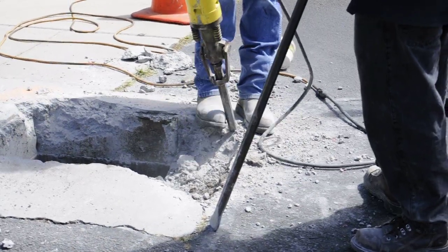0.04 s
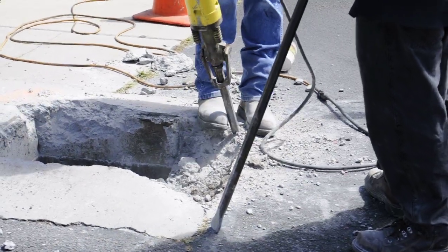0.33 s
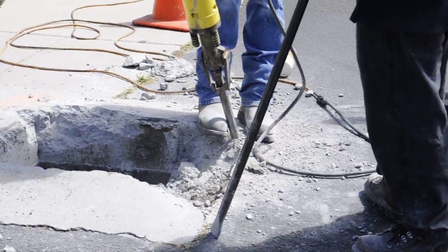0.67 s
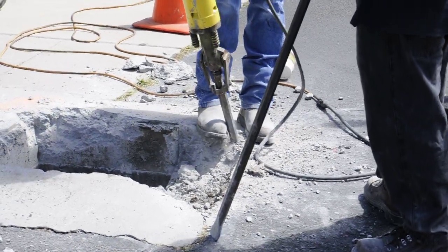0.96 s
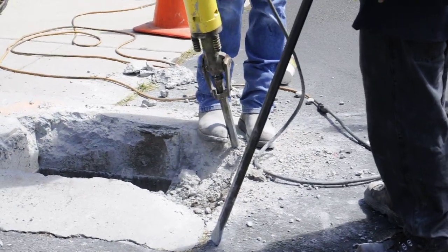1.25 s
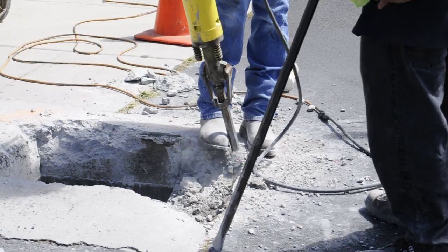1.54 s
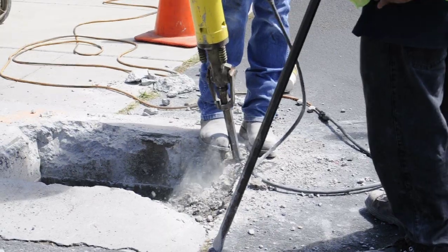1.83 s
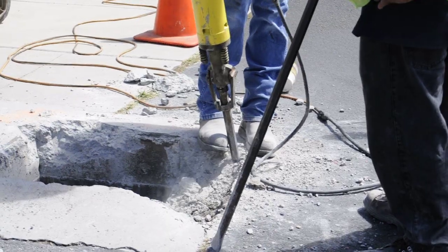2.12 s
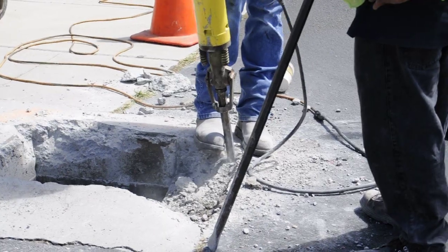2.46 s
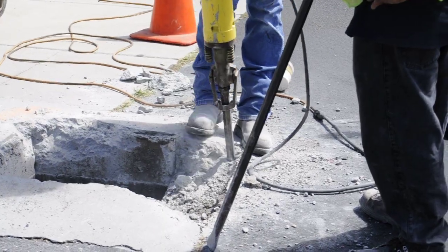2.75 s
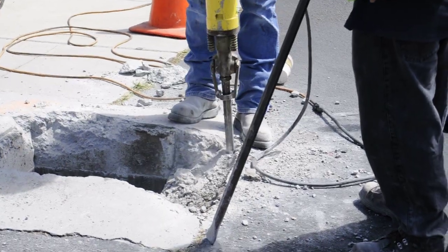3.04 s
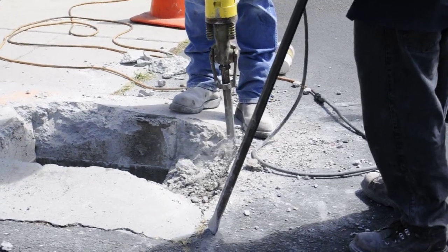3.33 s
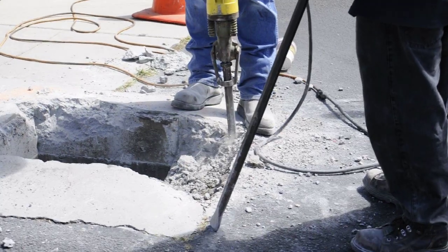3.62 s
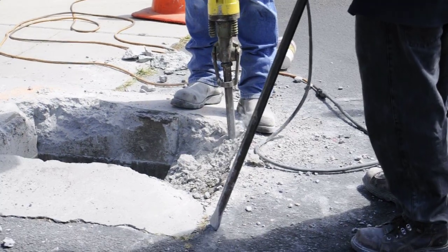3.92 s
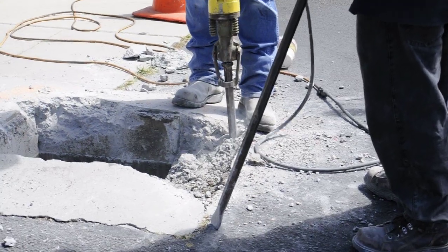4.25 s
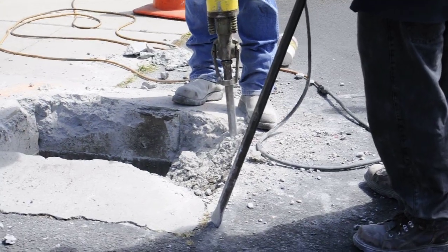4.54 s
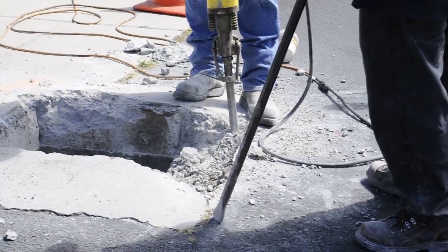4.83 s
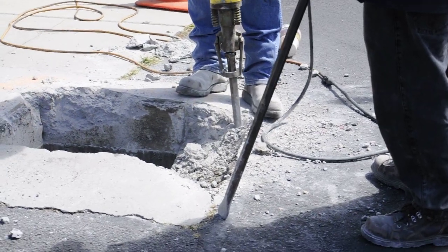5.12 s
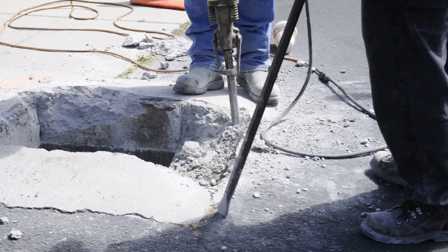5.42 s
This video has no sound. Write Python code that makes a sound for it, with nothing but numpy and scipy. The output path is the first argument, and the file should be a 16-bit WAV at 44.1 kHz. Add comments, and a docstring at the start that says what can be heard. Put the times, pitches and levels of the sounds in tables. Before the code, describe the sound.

Loud, continuous pneumatic hammering on concrete, with bright metallic clatter, crunching grit and hissing air, while an engine runs underneath.

```python
"""At the edge of a street trench, a pneumatic jackhammer breaks concrete, about 14 blows a second.
After each blow the chisel chatters in its holder, rings and crushes grit; compressed air hisses.
A compressor engine drones and thumps once a turn, and the house fronts return a short tail.
Overload rounds the peaks and crackles on the highest crests; the treble is cut at 6 kHz."""
import sys
import numpy as np
from scipy import signal
from scipy.fft import rfft, irfft, next_fast_len
from scipy.io import wavfile
from scipy.ndimage import map_coordinates

SR = 44100
rng = np.random.default_rng(int(sys.argv[2]) if len(sys.argv) > 2 else 0)


def store_pcm(level_fs):
    """Save levels as 16-bit WAV."""
    pcm = np.round(np.clip(level_fs, -1, 1) * 32767).astype(np.int16)
    wavfile.write(sys.argv[1], SR, np.atleast_2d(pcm).T)


N = 246078

# chisel modes, two groups: f/Hz, level/dB, t60/s
LOWER_MODES = [(4372, 0, .085)]
UPPER_MODES = [(5046, -5, 0.041), (5031, 8, 0.055), (5977, -16, 0.07)]
# concrete and housing spectra: f/Hz, level/dB
CRUNCH_SPECTRUM = [(60, -39), (200, -6), (420, -3), (620, -0.5), (800, -1), (1150, 2), (1500, 0), (1750, 1),
                   (2300, -1.5), (3200, -3), (6000, -15.5)]
CLATTER_SPECTRUM = [(1200, -37.5), (2400, -9), (2900, -9), (3350, -3), (4000, -3), (4500, 0), (4850, 0),
                    (5200, 0.5), (5450, -4), (5750, -12), (6100, -27)]


def jackhammer():
    """The same contacts crush the concrete, rattle the housing and ring the chisel."""
    times = blow_times()
    crunch_db, clatter_db, lower_db, upper_db = blow_levels(times)
    force = contacts(len(times), gap_s=.0075, strike_db=1.5, scatter_db=2.5, fade_db=2.5, seated_s=.072)
    grit = amp(3.26 * rng.standard_normal(force.shape))  # fragments of very unequal size
    cracks = grit * bursts(force, rise_s=.00051, t60_s=.015, tail_t60_s=.086)
    crunch = coloured(per_blow(times, cracks, crunch_db), CRUNCH_SPECTRUM)
    rattles = bursts(force, rise_s=.0035, t60_s=.026, tail_t60_s=.082)
    clatter = coloured(per_blow(times, rattles, clatter_db), CLATTER_SPECTRUM)
    lower = per_blow(times, ringing(force, LOWER_MODES, detune_hz=2.6), lower_db)
    t = np.arange(force.shape[1]) / SR
    early_force = force * amp(-7 * (t / .05) ** 2)  # late rebounds barely reach the upper modes
    upper = per_blow(times, ringing(early_force, UPPER_MODES, detune_hz=20), upper_db)
    return crunch + clatter + lower + upper


# piston pace: t/s, rate/Hz
PISTON_RATE = [(.14, 13.9), (.3, 13.06), (.5, 12.24), (1.0, 13.69), (1.9, 13.62), (3.05, 14.06),
               (3.8, 13.47), (4.2, 13.8), (5.58, 13.76)]


def blow_times(first_s=.067):
    """The piston strikes each time it completes a cycle."""
    cycles = np.cumsum(curve(PISTON_RATE)) / SR
    cycles -= cycles[round(first_s * SR)]
    return np.searchsorted(cycles, np.arange(int(cycles[-1]) + 1)) / SR


# blow force as the tool starts and is leant on: t/s, level/dB
EFFORT = [(.07, -13.5), (.14, -2.5), (.3, 0), (.5, 0.5), (1.2, 1.5), (1.8, 0), (2.75, .5), (3.2, -.5),
          (4.25, -.5), (4.45, .5), (4.65, -1), (4.9, 1), (5.1, -.5), (5.58, 0)]
# chisel seat, favouring the upper (+) or lower (-) modes: t/s, bias/dB
SEAT_BIAS = [(.25, -3.5), (.5, 0), (1.1, 1.5), (1.7, 3.5), (2.1, -1), (2.5, 1.5), (3.15, -0.5), (3.5, 3),
             (3.8, 2), (4.0, -3.5), (4.8, -6), (5.05, -1.5), (5.4, -6), (5.58, 0.5)]
# blows on hard stone: t/s, lower ring change/dB, upper ring change/dB
HARD_BLOWS = [(.76, 5.5, 0.5), (.91, 0, 2.5), (1.06, 8.5, -7), (1.21, 0.5, 1), (1.28, 4.5, 4.5),
              (1.5, 0.5, 2.5), (2.16, 0, 4), (2.38, -0.5, 5), (2.74, -2, 3.5), (3.02, -3.5, 5),
              (3.31, 1, 5), (4.04, 9.5, -3), (4.91, 4, -1.5), (5.42, 4, 0.5), (5.49, 6, -2)]


def blow_levels(times, ring_scatter_db=1.5, noise_scatter_db=.88):
    """Effort drives every part of a blow; the seat shares out the ring, and hard stone adds to it."""
    effort_db, seat_db = at(times, EFFORT), at(times, SEAT_BIAS)
    chance = rng.standard_normal((len(times), 4))
    extra_db = ring_scatter_db * chance[:, :2]
    for time_s, *change_db in HARD_BLOWS:
        extra_db[np.argmin(np.abs(times - time_s))] = change_db
    crunch_db = -25 + noise_scatter_db * chance[:, 2]
    clatter_db = -18 + noise_scatter_db * chance[:, 3]
    lower_db = -26 - .49 * seat_db + extra_db[:, 0]
    upper_db = -22.5 + seat_db + extra_db[:, 1]
    return effort_db + np.array([crunch_db, clatter_db, lower_db, upper_db])


def contacts(count, gap_s, strike_db, scatter_db, fade_db, seated_s):
    """One row of force per event: a strike, then uneven rebounds until the chisel is seated again."""
    shape, size = (count, 16), SR // 6
    gaps = gap_s * rng.uniform(.5, 1.5, shape)
    delays = np.cumsum(gaps, axis=1) - gaps[:, :1]
    pushes = amp(scatter_db * rng.standard_normal(shape) - fade_db * delays / seated_s)
    pushes *= delays < seated_s
    pushes[:, 0] = amp(strike_db)
    offsets = (delays * SR).astype(int)
    return np.array([np.bincount(offset, push, size)[:size] for offset, push in zip(offsets, pushes)])


def bursts(force, rise_s, t60_s, tail_t60_s, tail_db=-8):
    """Each contact sets off a short crack and a weaker, longer wash of dense modes."""
    t = np.arange(force.shape[1]) / SR
    decay = amp(-60 * t / t60_s) ** 2 + amp(tail_db - 60 * t / tail_t60_s) ** 2
    contact_power = decay * (1 - np.exp(-t / rise_s)) ** 2
    power = signal.fftconvolve(force ** 2, contact_power[None], axes=1)[:, :len(t)]
    return np.sqrt(np.abs(power)) * rng.standard_normal(force.shape)


def ringing(force, modes, detune_hz, rise_s=.0016):
    """Contacts ring the chisel; its seat shifts the modes a little from blow to blow."""
    t = np.arange(force.shape[1]) / SR
    ring = np.zeros(force.shape)
    for hz, db, t60_s in modes:
        gain = amp(db + 2 * rng.standard_normal((len(force), 1)))
        shifted_hz = hz + detune_hz * rng.standard_normal((len(force), 1))
        ring += gain * amp(-60 * t / t60_s) * np.sin(2 * np.pi * shifted_hz * t)
    return signal.fftconvolve(force, ring * (1 - np.exp(-t / rise_s)), axes=1)[:, :len(t)]


# shank bouncing off hard stone, chisel hitting its retainer: t/s, relative level/dB
PINGS = [(0.236, -23), (0.356, -24.5), (0.454, -21.5), (0.707, -23.5), (0.926, -24), (0.996, -23.5),
         (1.059, -25.5), (3.262, -24.5)]
CLINKS = [(0.47, -21.5), (0.55, -21), (0.625, -20.5), (0.711, -23.5), (0.942, -20), (1.519, -22),
          (3.535, -23)]
# their modes: f/Hz, level/dB, t60/s
PING_MODES = [(3130, -3.5, .08), (3180, -6.5, 0.076)]
CLINK_MODES = [(5487, 0, 0.1), (5505, -1.5, 0.072)]


def steel_chime(events, modes, gain_db, faint_db, fade_db_per_s, lag_s, scatter_db=4):
    """Steel contacts ring: a few loud runs, and a faint one per blow, waning as the chisel sinks in."""
    blows = blow_times()
    run_db = faint_db - fade_db_per_s * blows + at(blows, EFFORT)
    run_db += scatter_db * rng.standard_normal(len(blows))
    faint_runs = np.column_stack([blows + lag_s, run_db])
    times, level_db = np.vstack([events, faint_runs]).T
    force = contacts(len(times), gap_s=.009, strike_db=3.5, scatter_db=.5, fade_db=5.5, seated_s=.035)
    return per_blow(times, ringing(force, modes, detune_hz=2.6), level_db + gain_db)


# air flow as the trigger opens: t/s, level/dB
AIR_FLOW = [(0, 1.5), (.12, -1), (.18, 0)]


def air():
    """Compressed air leaves the tool with a fluttering hiss and a weaker roar."""
    hiss = amp(-26 + 1.6 * wobble(25)) * coloured(rng.standard_normal(N), CLATTER_SPECTRUM)
    roar = amp(-34) * coloured(rng.standard_normal(N), CRUNCH_SPECTRUM)
    return amp(curve(AIR_FLOW)) * (hiss + roar)


SHAFT_HZ = 22.68
# exhaust thumps: t/s, relative level/dB
THUMP_LEVEL = [(0, -24), (.22, -19), (.3, -30.5), (1.2, -29.5), (2.7, -27.5), (3.15, -22), (3.65, -20),
               (4.35, -18), (4.55, -30), (5.58, -37)]
# exhaust noise: f/Hz, level/dB
PUFF_SPECTRUM = [(30, -20.5), (100, -17), (200, -11), (275, 3.5), (340, -2.5), (480, -17), (1500, -32.5)]


def exhaust(first_s=.007, rise_s=.0027, t60_s=.05, trench_hz=275, scatter_db=1.5, gap_db=4.5):
    """Once a turn an engine puff booms in the trench; those between two blows come through loudest."""
    times = np.arange(first_s, N / SR, 1 / SHAFT_HZ)
    chance = rng.standard_normal((len(times), 2))
    blows = blow_times()
    piston_cycles = np.interp(times, blows, np.arange(len(blows)))
    between_blows = np.cos(2 * np.pi * (piston_cycles - .65))
    level_db = at(times, THUMP_LEVEL) + gap_db * between_blows + scatter_db * chance[:, 0]
    t = np.arange(SR // 8) / SR
    envelope = (1 - np.exp(-t / rise_s)) * amp(-60 * t / t60_s)
    puffs = amp(level_db)[:, None] * envelope / envelope.max()
    boom_hz = trench_hz * np.exp(.05 * chance[:, 1:])
    boom = placed(times, puffs * np.sin(2 * np.pi * boom_hz * t))
    rush = placed(times, puffs) * coloured(rng.standard_normal(N), PUFF_SPECTRUM)
    return amp(-8.5) * boom + amp(-12) * rush


# compressor drone: t/s, relative level/dB
DRONE_LEVEL = [(0, -25), (.1, -27.5), (.23, -24), (.25, -32), (.45, -37), (.9, -40.5), (2, -37.5),
               (3.2, -35.5), (4.6, -35.5), (5.58, -41)]
# engine lines: shaft order, level/dB
SHAFT_ORDERS = [(2, -27.5), (4, -3.5), (6, -9.5), (11, 1.5), (12, 4), (14, 4)]
# engine rumble: f/Hz, level/dB
RUMBLE_SPECTRUM = [(20, -31.5), (45, -9), (70, -2), (110, -0.8), (160, 1), (280, -2.5), (440, -2.5),
                   (650, -8.5), (850, -5.5), (1150, -4), (1420, -12), (1800, -7), (2700, -21), (6000, -36)]


def compressor(first_s=.01702):
    """An engine fires twice a turn: a throbbing rumble with steady shaft lines."""
    speed = 1 + .0015 * wobble(2)
    angle = 2 * np.pi * SHAFT_HZ * (np.cumsum(speed) / SR - first_s)
    lines = sum(amp(db) * np.sin(order * angle + rng.uniform(0, 2 * np.pi)) for order, db in SHAFT_ORDERS)
    firing_db = 1.7 * np.cos(angle) + 3 * np.cos(2 * angle) + 2.2 * np.cos(4 * angle)
    rumble = coloured(unit(amp(firing_db) * rng.standard_normal(N)), RUMBLE_SPECTRUM)
    return amp(curve(DRONE_LEVEL)) * (amp(3) * rumble + amp(-8.5) * unit(lines))


def street(x, t60_s=.3, rise_s=.008):
    """House fronts and pavement return a short diffuse tail."""
    t = np.arange(SR // 2) / SR
    tail = rng.standard_normal(len(t)) * amp(-60 * t / t60_s) * (1 - np.exp(-t / rise_s))
    return signal.fftconvolve(x, tail / np.linalg.norm(tail))[:N]


def amp(db):
    """Decibels to gain."""
    return 10 ** (np.asarray(db) / 20)


def unit(x):
    """Scale each row to rms 1."""
    return x / np.sqrt(np.mean(x ** 2, axis=-1, keepdims=True) + 1e-20)


def at(times, rows):
    """Read (t/s, value) rows at the given times."""
    return np.interp(times, *np.transpose(rows))


def curve(rows):
    """One value per sample from (t/s, value) rows."""
    return at(np.arange(N) / SR, rows)


def wobble(rate_hz):
    """A smooth random curve, rate_hz knots a second."""
    knots = rng.standard_normal(int(N * rate_hz / SR) + 4)
    return map_coordinates(knots, [np.arange(N) * rate_hz / SR])


def filtered(x, response):
    """Apply a gain given as a function of frequency."""
    size = next_fast_len(N + SR // 4)
    return irfft(rfft(x, size) * response(np.fft.rfftfreq(size, 1 / SR)), size)[:N]


def coloured(x, spectrum, top_hz=7000):
    """Shape x by (f/Hz, level/dB) rows; white input keeps its power."""
    points_hz, points_db = np.transpose(spectrum)

    def response(hz):
        db = np.interp(np.log(hz + 1), np.log(points_hz), points_db)
        return unit(amp(db) * (hz < top_hz))
    return filtered(x, response)


def placed(times, sounds):
    """Lay one row of sounds at each time."""
    where = np.round(np.asarray(times)[:, None] * SR).astype(int) + np.arange(sounds.shape[1])
    return np.bincount(np.maximum(where, 0).ravel(), sounds.ravel(), N)[:N]


def per_blow(times, sounds, level_db):
    """Lay one sound at each time; level_db is its rms over a piston cycle."""
    cycle_samples = SR / np.mean(np.transpose(PISTON_RATE)[1])
    gain = np.sqrt(cycle_samples / sounds.shape[1]) * amp(level_db)
    return placed(times, unit(sounds) * gain[:, None])


def scene():
    """Hammer and exhaust echo in the street, over air hiss and compressor drone."""
    pings = steel_chime(PINGS, PING_MODES, gain_db=-3, faint_db=-32, fade_db_per_s=1.5, lag_s=.01)
    clinks = steel_chime(CLINKS, CLINK_MODES, gain_db=-2, faint_db=-31, fade_db_per_s=1.3, lag_s=.02)
    knocks = jackhammer() + pings + clinks + exhaust()
    return (knocks + amp(-14) * street(knocks) + air() + compressor())[None]


# brief level dips: t/s, half width/s, depth/dB
LEVEL_DIPS = [(.908, 0.0046, 4), (0.951, .007, 5), (1.518, 0.0064, 6.5), (1.815, 0.0072, 6.5),
              (1.963, 0.0055, 8.5), (2.254, 0.013, 10), (2.330, .0125, 12.5), (5.376, 0.013, 7)]


def record(dry, ceiling=.5, hardness=5, knee=.66, headroom=.053, treble_hz=6020, top_hz=15800):
    """Overload rounds the peaks, the level dips, the treble is cut, and overshoots clip with a crackle."""
    t = np.arange(N) / SR
    rounded = dry[0] / (1 + np.abs(dry[0] / ceiling) ** hardness) ** (1 / hardness)
    dip_db = sum(depth * np.exp(-np.abs((t - s) / width) ** 4.8) for s, width, depth in LEVEL_DIPS)
    treble_cut = signal.ellip(12, .1, 90, treble_hz, fs=SR, output="sos")
    dull = signal.sosfilt(treble_cut, rounded * amp(1.07 - dip_db))
    below_knee = np.clip(dull, -knee, knee)
    clipped = below_knee + headroom * np.tanh((dull - below_knee) / headroom)
    return filtered(clipped, lambda hz: hz ** 2 / (hz ** 2 + 30 ** 2) * (hz < top_hz))[None]


dry = scene()
out = record(dry)
store_pcm(out)
```